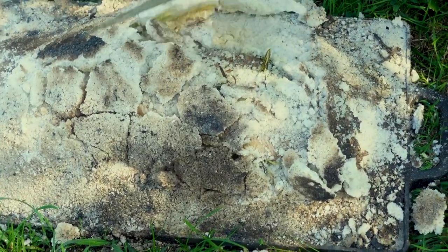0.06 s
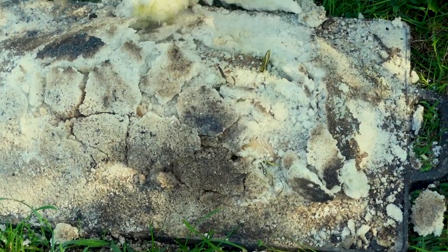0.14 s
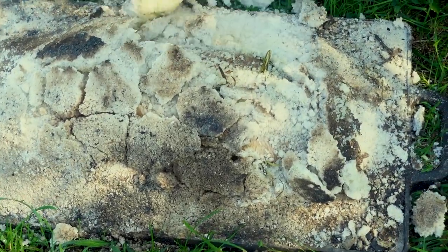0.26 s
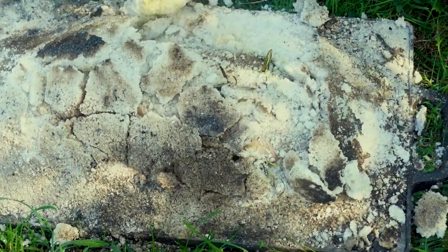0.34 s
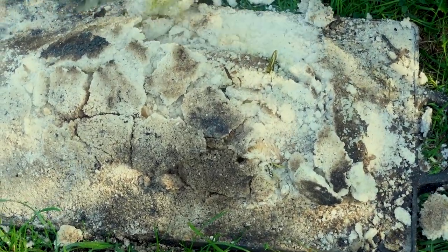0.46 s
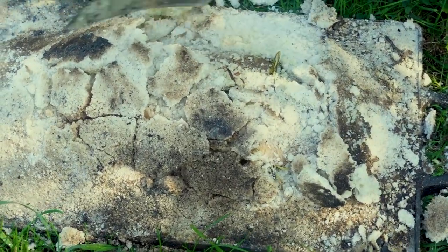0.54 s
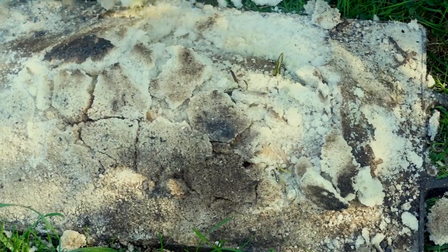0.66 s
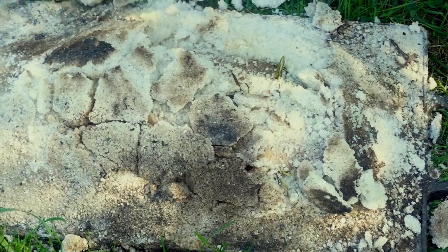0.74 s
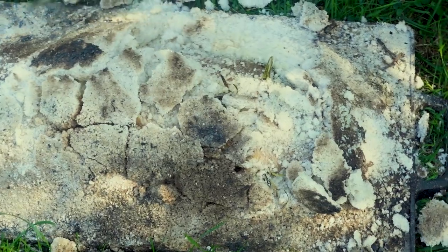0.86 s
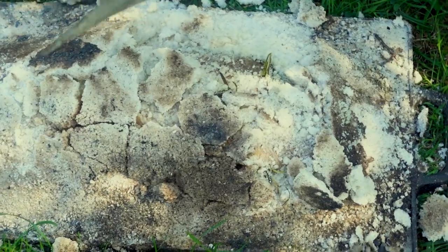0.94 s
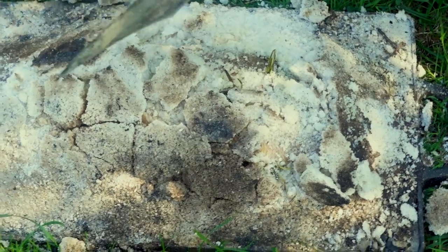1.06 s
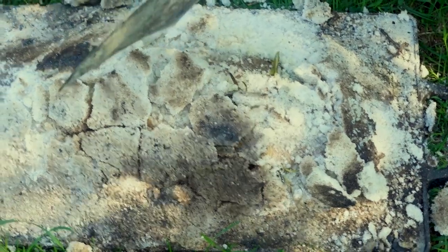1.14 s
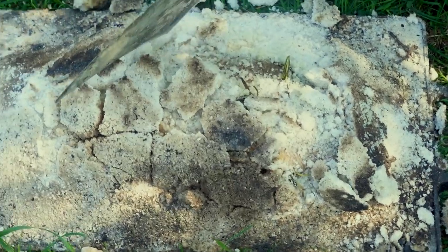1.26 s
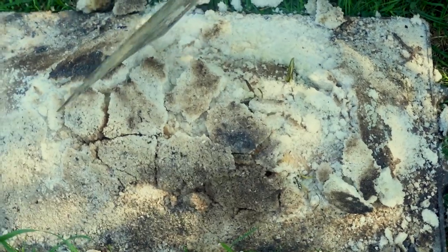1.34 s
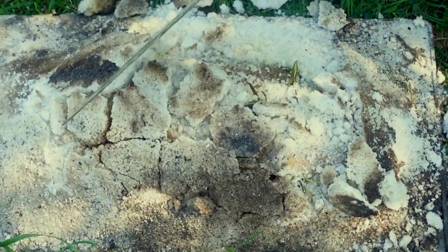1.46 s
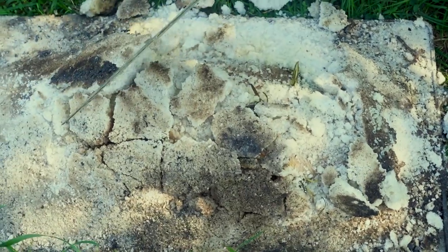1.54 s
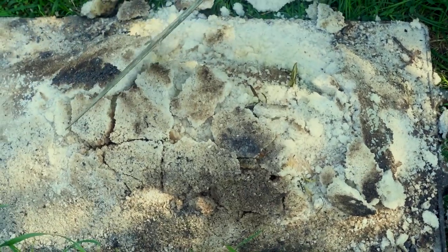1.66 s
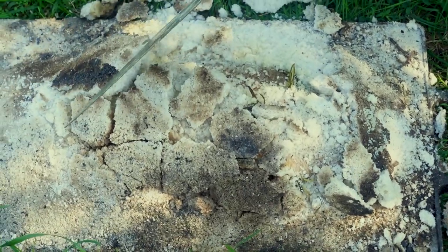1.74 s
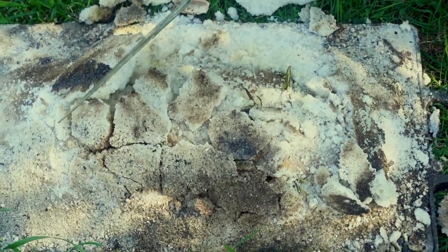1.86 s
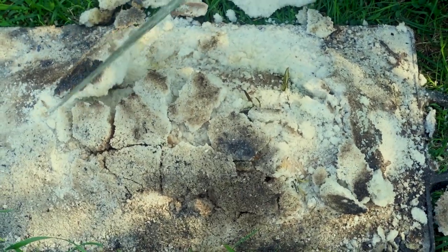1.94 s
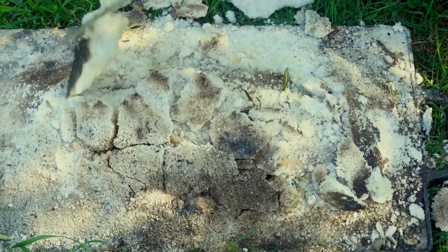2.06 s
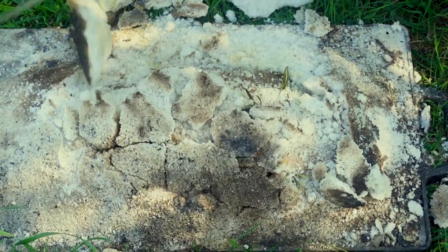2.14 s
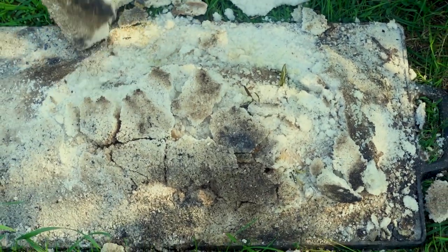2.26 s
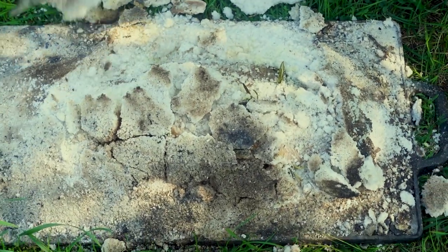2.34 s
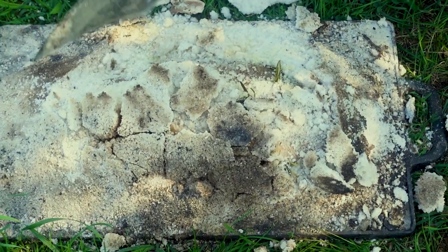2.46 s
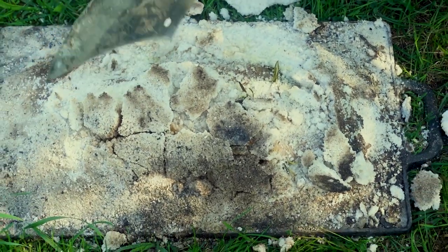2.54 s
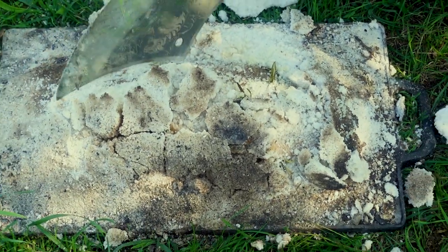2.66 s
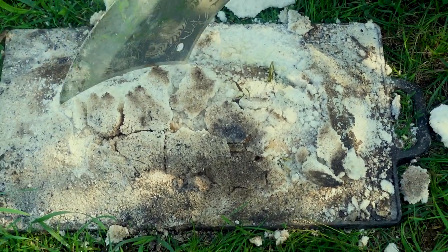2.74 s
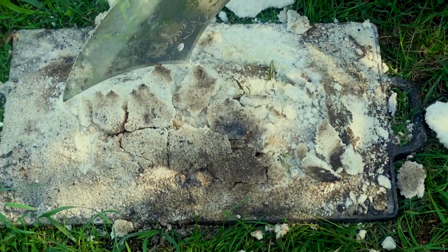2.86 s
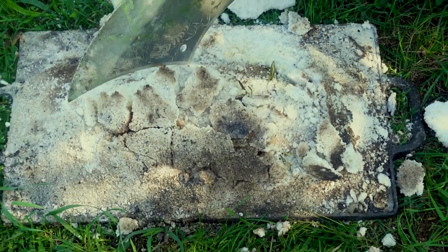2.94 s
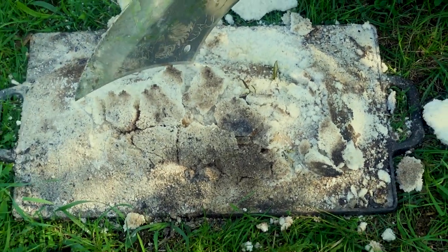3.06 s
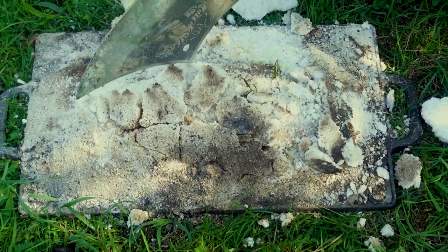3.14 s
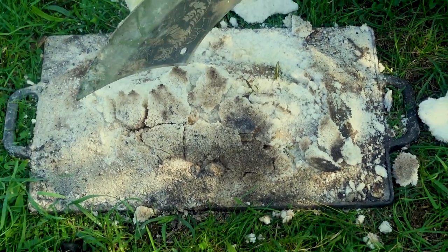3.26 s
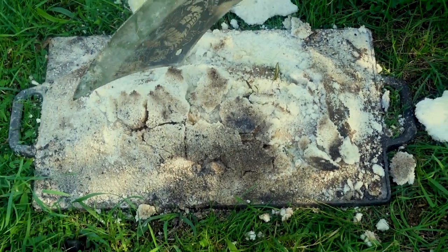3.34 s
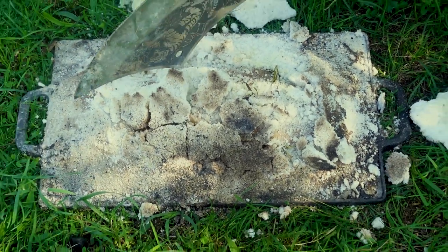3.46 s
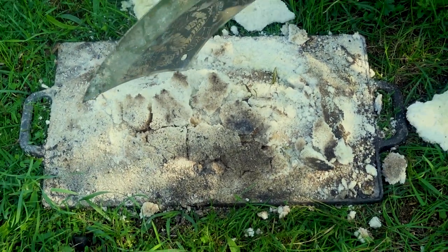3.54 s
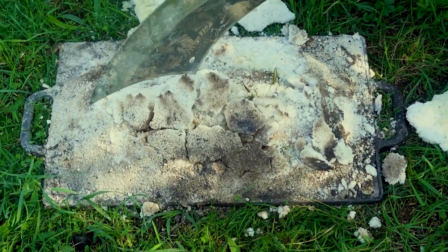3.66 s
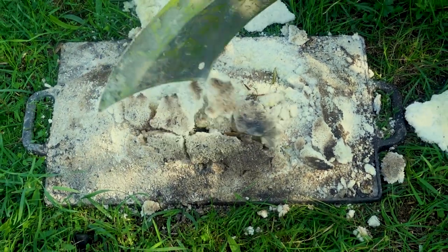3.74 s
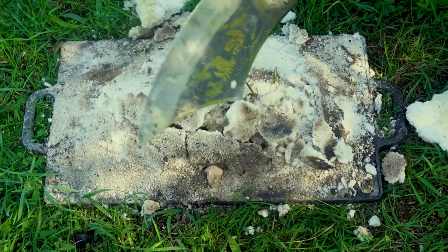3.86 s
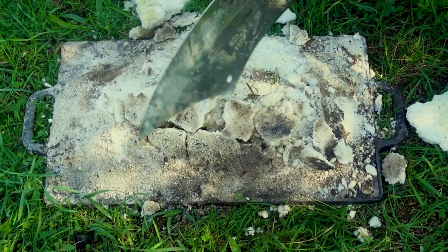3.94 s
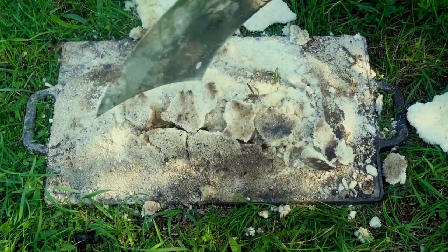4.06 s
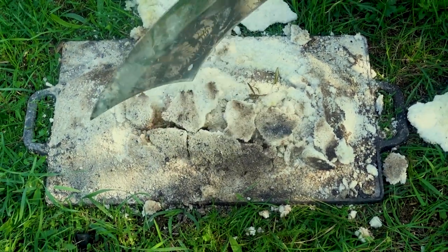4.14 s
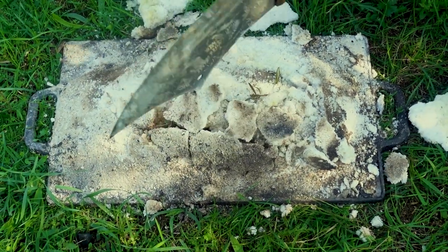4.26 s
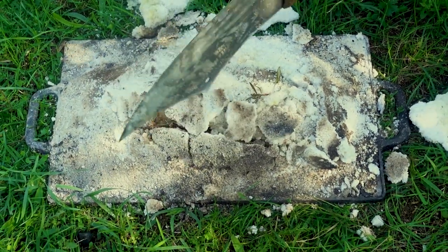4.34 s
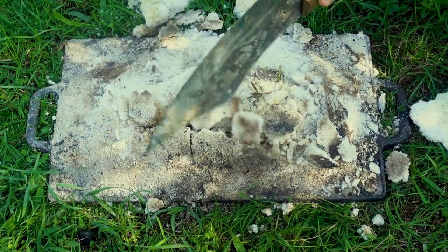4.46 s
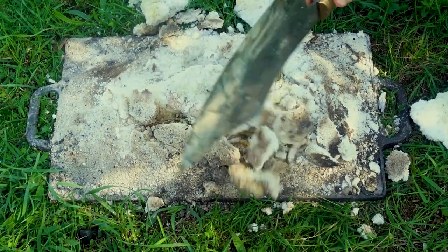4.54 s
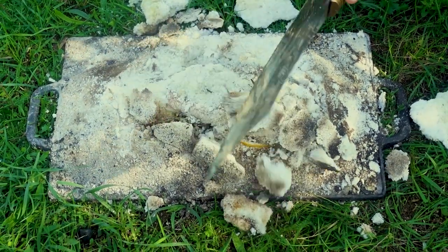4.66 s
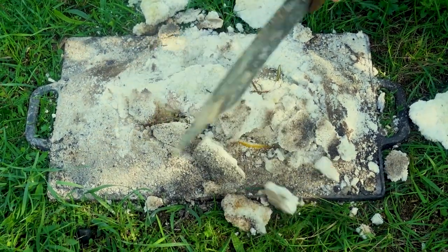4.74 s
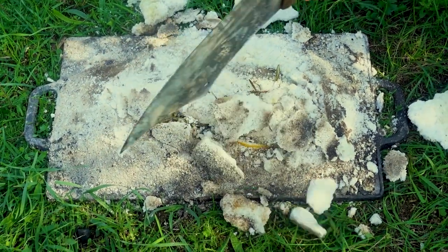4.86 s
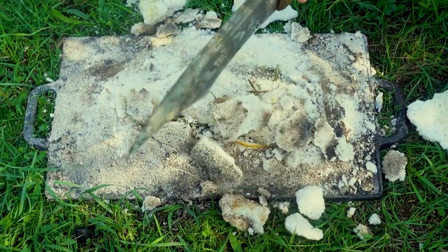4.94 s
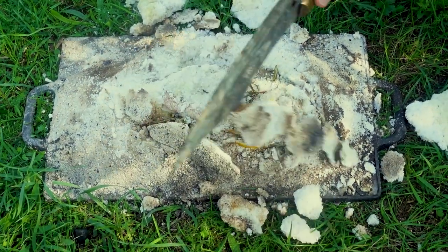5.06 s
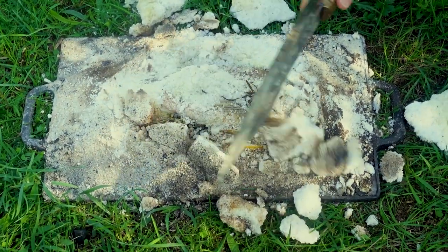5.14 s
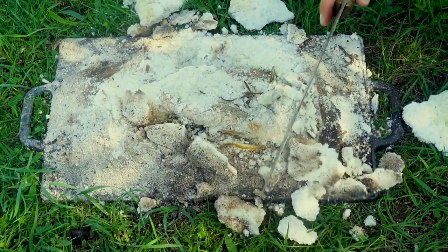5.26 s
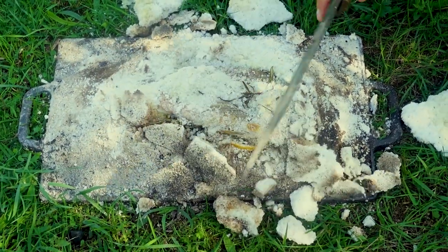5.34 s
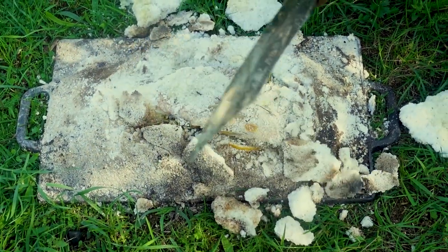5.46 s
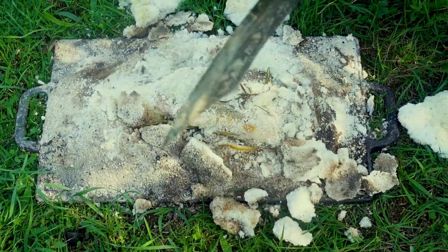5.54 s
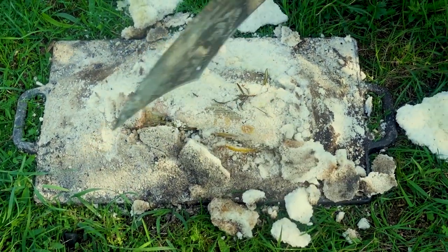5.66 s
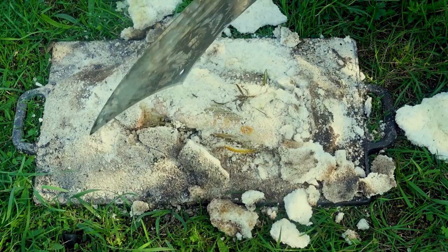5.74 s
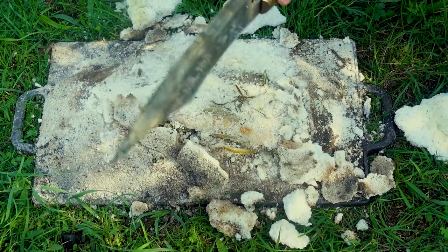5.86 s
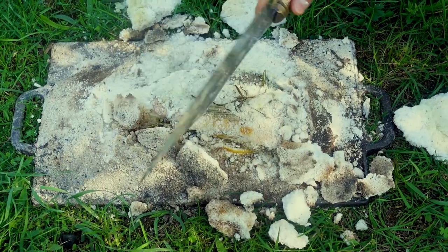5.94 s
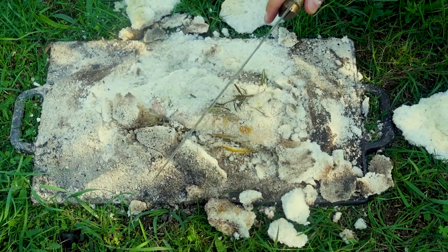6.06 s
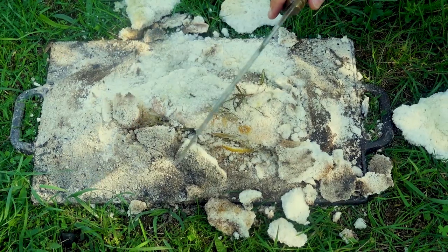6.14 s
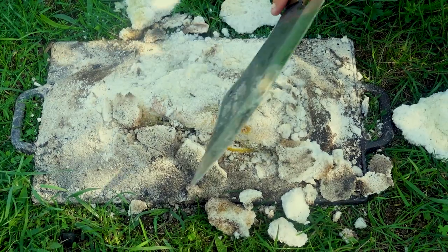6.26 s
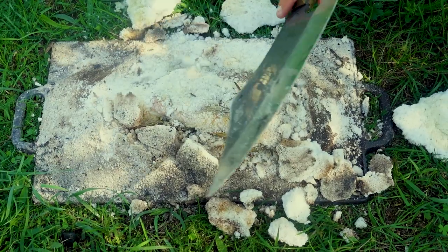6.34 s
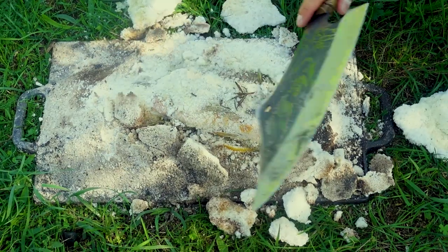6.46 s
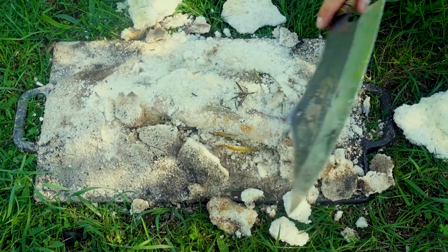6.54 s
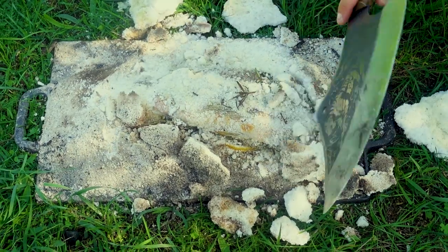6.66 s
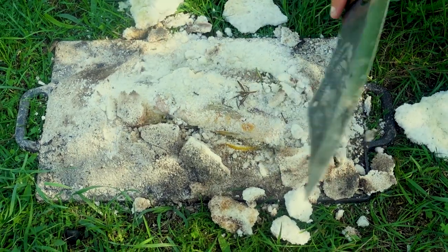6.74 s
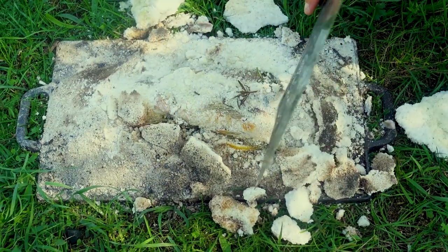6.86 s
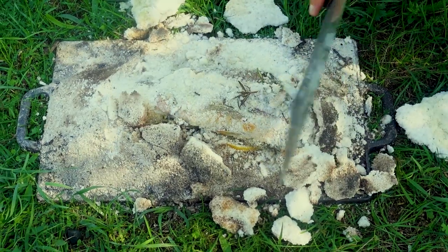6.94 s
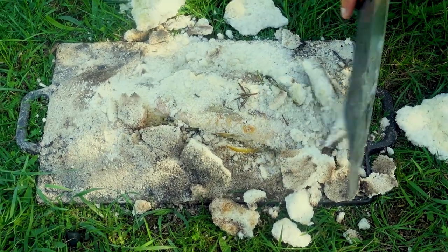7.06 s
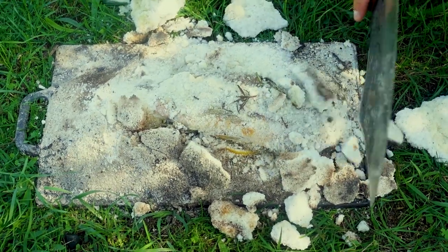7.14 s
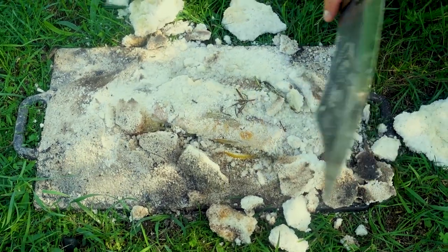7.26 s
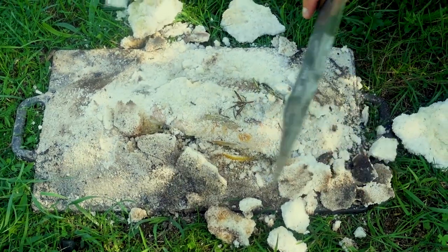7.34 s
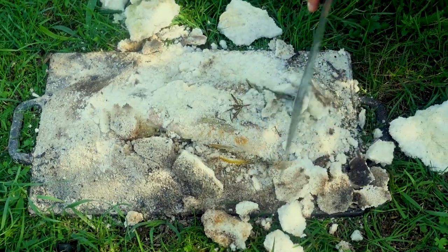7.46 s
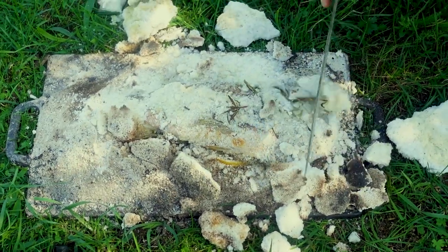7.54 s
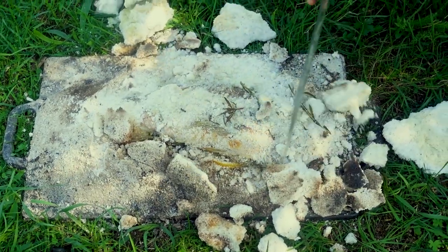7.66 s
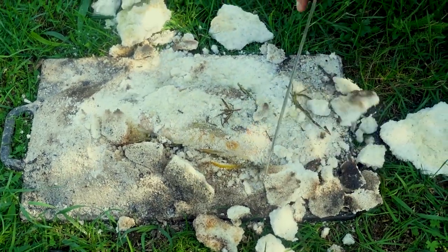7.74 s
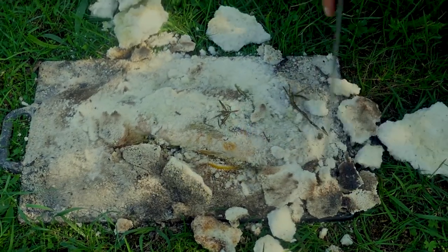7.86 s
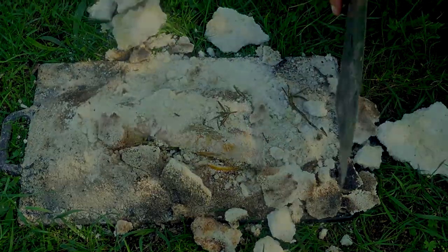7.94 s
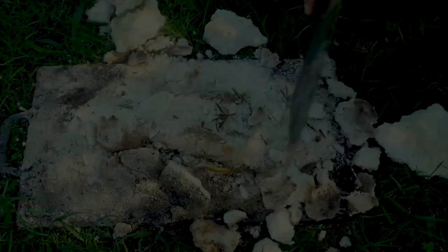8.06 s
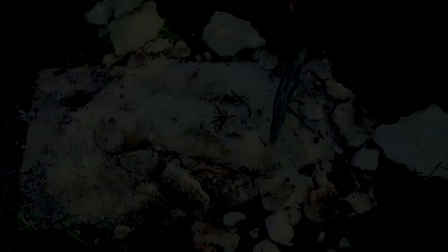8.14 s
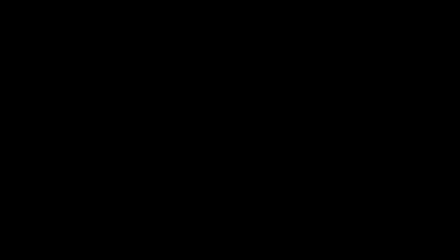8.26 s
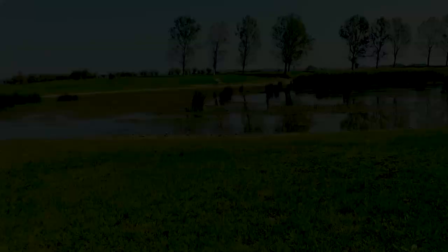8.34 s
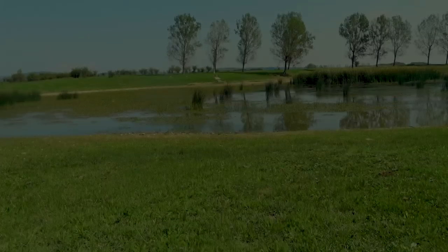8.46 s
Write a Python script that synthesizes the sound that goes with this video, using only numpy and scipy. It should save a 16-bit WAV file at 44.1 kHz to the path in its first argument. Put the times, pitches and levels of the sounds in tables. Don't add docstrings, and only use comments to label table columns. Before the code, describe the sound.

A steel blade cracks, crunches and scrapes through a hot baked salt crust over steady sizzling, chunks thudding, then abruptly only a faint low gust.

```python
import sys
import numpy as np
from scipy import signal
from scipy.fft import rfft, irfft, next_fast_len
from scipy.io import wavfile
from scipy.ndimage import uniform_filter1d, map_coordinates

SR = 44100
rng = np.random.default_rng(int(sys.argv[2]) if len(sys.argv) > 2 else 0)


def dump_mix(stems):
    frames = np.atleast_2d(stems).T
    limited = np.clip(frames, -1, 1)
    pcm = np.round(limited * 32767).astype(np.int16)
    wavfile.write(sys.argv[1], SR, pcm)


def natural_amplitude(level_db):
    exponent = np.asarray(level_db, float) / 20
    return 10 ** exponent


N = 374398
PADDED = next_fast_len(N)
SCENE_CHANGE_S = 8.277

# [start_s, peak_db, pitch_hz]
SNAPS = [(2.43, -35.5, 1900), (4.417, -33, 1850), (4.424, -33, 1850), (4.6285, -30, 3300),
         (1.2176, -32, 2890), (1.3391, -9.5, 3030), (1.3847, -28, 2900), (1.4286, -35, 3030),
         (1.4332, -26, 2620), (1.52, -19, 3340), (1.528, -24, 3220), (1.5345, -27, 3300),
         (1.539, -31, 3300), (1.543, -32, 3600), (1.3392, -15.5, 4940), (1.3394, -27, 1590),
         (1.5192, -25.5, 4280), (1.5294, -33, 4600), (5.3425, -29, 2680), (4.5962, -34.5, 1110),
         (4.588, -34, 1300), (4.6405, -31, 3400), (4.7075, -32, 1500), (4.7872, -30, 3320),
         (4.802, -30, 2400), (7.2164, -33, 3300), (3.5562, -34, 2220), (3.963, -33, 3170),
         (4.628, -27, 2050), (4.6687, -33, 1700), (5.0897, -24, 3840), (5.1626, -20.5, 1950),
         (5.2722, -31, 2900), (6.9858, -33, 3470)]
# [start_s, peak_db, pitch_hz]
SPLITS = [(1.5613, -31, 1740), (2.5506, -30, 6720), (3.879, -32, 1350), (3.9944, -23, 1430),
          (4.1085, -32, 4690), (4.2724, -25, 7000), (4.313, -26, 5870), (4.3491, -28, 6230),
          (4.3571, -28, 5320), (4.5342, -29, 5000), (4.5494, -26, 3300), (4.716, -22.5, 1400),
          (4.754, -33, 1310), (4.7881, -34, 1930), (5.21, -28, 4670), (5.3195, -36, 4910),
          (5.3424, -23, 1460), (7.217, -27, 1550), (7.2155, -35, 5800), (3.852, -31, 4850),
          (3.9335, -34, 2800), (7.6481, -20.5, 7240), (7.767, -34, 1200), (7.8002, -31.5, 1780)]
# [start_s, peak_db, pitch_hz, blade_ring_db]
STRIKES = [(0.6519, -25.5, 4770, 9.5), (4.4383, -19, 5200, -4), (5.9825, -14, 5350, -21),
           (5.987, -16, 6500, -14), (5.9944, -8.5, 6790, -20), (6.0072, -14, 7530, -22),
           (6.0115, -18, 6520, -16), (6.0142, -21, 6940, -19), (6.027, -32, 8000, -20),
           (6.0425, -30, 6000, -15), (6.0538, -21, 5290, -10), (6.0643, -11, 4800, -13),
           (6.0793, -19, 6320, -11), (6.0829, -19, 6330, -31), (6.1226, -26, 5340, -14),
           (6.1741, -22, 4480, -16), (6.4776, -38, 4420, -16), (6.5136, -25, 2700, -20),
           (6.582, -26, 5600, -11), (6.5895, -21, 6500, -3.5), (6.6271, -25, 4410, -1.5),
           (6.6663, -21, 4000, -6), (7.0255, -29, 4700, -17), (7.0429, -18, 2870, -12),
           (7.109, -23, 4620, -9), (7.436, -23, 5600, -8), (7.4518, -28.5, 1640, -25)]

# [peak_s, length_ms, level_db, treble_db]
CRUSHES = [(.79, 60, -42, -3), (1.433, 44, -42.5, -24), (1.54, 30, -42, -15), (1.558, 42, -50, -22),
           (2.55, 116, -63, 16), (3.558, 22, -48, -6), (3.805, 14, -43, 0.5), (3.84, 63, -45, 1),
           (3.854, 14, -40, 2.5), (3.893, 14, -40.5, -8), (3.868, 23, -36.5, -5), (3.9, 130, -44.5, -6),
           (4.536, 53, -40.5, -10), (4.588, 75, -41, -14), (4.634, 63, -38, -1), (4.705, 20, -50, -15),
           (4.754, 31, -47, 1), (4.786, 25, -42, -7), (5.094, 63, -39.5, 1), (5.135, 55, -39, -2),
           (5.16, 33, -32.5, -1.5), (5.195, 82, -39.5, 1), (7.216, 21, -42, 2)]
# [peak_s, length_ms, level_db, treble_db]
SCRAPES = [(4.555, 26, -38, 3), (5.987, 16, -31, 5), (5.996, 17, -34.5, 8), (6.009, 29, -38.5, 7.5),
           (6.047, 56, -41, -2), (6.065, 25, -35.5, 6), (6.08, 30, -32, 4), (6.114, 37, -45.5, 0),
           (6.143, 36, -44, -1), (6.181, 44, -42, -7), (6.203, 53, -43.5, 3.5), (6.518, 85, -36.5, .5),
           (6.552, 130, -39, -2), (6.59, 42, -32.5, 6.5), (6.628, 42, -32, .5), (6.647, 32, -34.5, -2),
           (7.441, 19, -36, -1), (7.527, 40, -40.5, -4), (7.582, 30, -48, -1)]
# [peak_s, length_ms, level_db, treble_db]
CLINKS = [(0.656, 13, -45, 4), (4, 30, -38.5, -6), (4.442, 24, -31.5, 0.5), (6.668, 14.4, -25.5, 1),
          (7.05, 20, -34, -3.5), (7.062, 25, -30, -3.5), (7.087, 14, -35, 3), (7.08, 50, -44, -8),
          (6.25, 140, -47, -10), (6.092, 28, -46, 0), (7.113, 27, -30.5, -3.5), (7.107, 9, -33, 3),
          (7.13, 27, -37.5, -11)]
# [peak_s, length_ms, level_db, treble_db]
BITES = [
    (5.068, 25, -34, -3),
    (7.043, 14, -34, -2),
    (5.143, 16, -36, 1),
    (6.479, 56, -41, -2),
    (6.583, 12, -39, 2),
]
# [peak_s, length_ms, level_db, treble_db]
DRAGS = [
    (.78, 400, -41, -19),
    (6.72, 160, -53.5, 4),
]
PUSH_KINDS = [
    (0.4, 0.05),
    (0.41, 0.37),
    (0.36, 0.82),
    (0.039, 0.43),
    (0.1, 0.18),
]

# [mode_hz, width_hz, level_db]
BLADE_MODES = [(2050, 21, -9.5), (2400, 34, -2.5), (2660, 45, -3.5), (3600, 30, -10), (3390, 50, -3.5),
               (3916, 97, 2.5), (4425, 38, -1.5), (5210, 91, 0.5), (6290, 100, 0.5), (6875, 120, 2),
               (8280, 47, -5.5), (8760, 43, -7.5), (9300, 110, -9.5), (9960, 65, -5), (1310, 18, -11)]
# [start_s, first_hz, second_hz, third_hz]
CONTACT = [(0, 4430, 6300, 8260), (4.0, 3900, 4430, 6890), (4.5, 6300, 6890, 3900), (5.0, 2370, 3900, 4430),
           (5.9, 6890, 8650, 3410), (6.03, 6300, 3410, 1310), (6.13, 6890, 4430, 6300),
           (6.222, 4430, 3600, 2370), (6.46, 6300, 4430, 3900), (6.56, 6300, 6890, 4430),
           (6.615, 3900, 6890, 6300), (6.655, 3900, 2650, 8650), (7.0, 4430, 3900, 6890),
           (7.052, 2650, 6300, 3900), (7.08, 6890, 6890, 2650), (7.109, 3900, 6300, 6890),
           (7.4, 6300, 4430, 2650)]
MUTING_DB = [-11, -5.5, -10, -4, -5, -6, -3, -8, -3, -5.5, -5, -8, -5.5, -6, -5, -6, -7]

# [start_s, peak_db, pitch_hz]
THUDS = [(1.144, -38.5, 447), (1.259, -43, 445), (1.287, -46, 453), (1.324, -39.5, 190), (1.326, -42, 555),
         (1.366, -39, 348), (1.428, -37, 454), (1.557, -35, 470), (1.566, -36, 398), (2.651, -57, 447),
         (2.69, -53, 434), (4.716, -36, 800), (4.598, -48, 645), (5.342, -43, 605), (5.344, -48, 220),
         (3.893, -48.5, 516), (4.749, -42.5, 645), (4.787, -41.5, 720), (5.079, -41, 770),
         (6.581, -45, 550), (7.054, -37, 480), (7.06, -42, 230), (7.215, -30, 500), (7.549, -47, 537),
         (7.699, -49, 517), (7.765, -36.5, 674), (7.798, -42, 645), (7.95, -49, 614), (7.52, -48, 566),
         (7.85, -40, 543), (7.879, -36, 574)]

# [frequency_hz, level_db (per Hz)]
SIZZLE_COLOUR = [(410, -22), (700, -15.5), (1150, -12), (1360, -9), (1570, -10.5), (1960, -6), (2790, -2.5),
                 (3020, -3), (3720, -3.5), (4580, -5.5), (6590, -12.5), (12200, -20.5), (15800, -29)]
SIZZLE_EDGES_HZ = (1100, 2500, 5000, 9000, 15000)
# [rest_level_db, vigour_slope (dB/dB), brightness_slope (dB/dB)]
SIZZLE_ANSWER = [
    (-54.5, 0.91, -0.93),
    (-52.5, 0.52, -0.16),
    (-51.5, 1.2, 0.13),
    (-57.5, 0.84, 1),
]
# [centre_hz, width_hz, level_db]
HOLLOWS = [(622, 93, 5.5), (1300, 82, 2.5), (1726, 190, 4), (2980, 260, 0), (4000, 410, 1)]
# [time_s, vigour_db, brightness_db]
STEAM = [(0, 1, -4), (.14, 4.5, -2.5), (.45, 3.5, 0.5), (.7, 3, 0), (.9, 2.5, 0.5), (1.3, 2, -3.5),
         (1.7, -4, -1.5), (2.05, -2.5, 2), (2.56, .1, 3), (2.7, -6.5, 1), (3.78, -5, -1), (4.0, 0.3, -2),
         (4.35, 3, 1), (4.9, 0.5, 0), (5.6, -1.5, 1), (6.45, -1, 1), (7.37, -1.5, -0.7), (8.27, -1.5, 1)]
# [peak_s, extra_vigour_db]
VENTS = [
    (4.63, 3.5),
    (5.3, 3.5),
    (6.72, 6.5),
    (7.76, 1.5),
]
# [start_s, extra_path_ms, share (-1..1, negative = inverted)]
MIRROR = [(0, 1.15, .12), (.95, .42, .15), (1.42, .657, .34), (2.17, .6, 0), (2.66, .535, -.36),
          (3.19, .655, .12), (3.35, .505, .22), (3.85, .475, .15), (4.03, .415, .11), (5.35, .425, .2),
          (5.68, .425, .07)]
# [start_s, end_s, start_hz, end_hz, level_db]
GLINTS = [
    (2.2, 2.53, 5000, 15500, 4),
    (2.41, 2.66, 5200, 13500, 7),
    (.05, 0.43, 5500, 15000, 3),
    (4.1, 4.38, 7600, 11600, 5),
    (.75, 1.0, 2500, 2700, 4),
    (.36, 0.71, 14400, 16000, 6.5),
    (.64, 0.82, 10300, 2300, 4.5),
]
# [delay_ms, share]
RIM_ECHOES = [
    (1.29, .12),
    (2.55, .09),
]

# [time_s, left_minus_right_db]
LEAN = [(0.0, -0.2), (1.6, -1.5), (2.6, -0.8), (5.6, -0.4), (6.7, -1), (7.3, -1.5), (7.6, -1)]
# [time_s, half_lag_samples]
PORT_LAG = [(0, .2), (1.05, .2), (1.15, .6), (1.6, .6), (3.6, .55), (3.75, .2), (8.49, .2)]
# [frequency_hz, likeness (0-1)]
LIKENESS = [(30, .97), (70, 1), (200, .48), (400, 0.19), (750, 0.38), (1300, 0.77), (2400, 0.95),
            (6000, .94), (15000, 0.84)]

# [frequency_hz, level_db (per Hz)]
AIR = [(15, -70), (25, -40.5), (50, -21), (91, -7), (235, -6), (278, -8), (323, -9.5), (403, -6.5),
       (1140, -13.5), (1400, -10), (1820, -54.5), (3080, -120)]
AIR_DB = -68.5
# [frequency_hz, level_db (per Hz)]
GUST = [(15, -53), (25, -25.5), (33, -32), (70, -26), (86, -36), (107, -18), (200, -15), (276, -8),
        (342, -15.5), (392, -28.5), (461, -25), (572, -27), (5090, -38.5), (15800, -52.5)]
# [time_s, level_db]
GUST_SWELL = [(8.28, -60.5), (8.32, -61), (8.36, -61), (8.41, -61), (8.45, -60.5), (8.49, -61)]
# [frequency_hz, level_db (per Hz)]
MEADOW = [(500, -12.5), (1000, -5), (1600, -1), (2400, -2.5), (4500, -8.5), (7500, -10.5), (12000, -14.5),
          (15800, -21.5)]
MEADOW_DB, MEADOW_AFTER_DB = -61.5, -9
# [time_s, level_db]
INSECTS = [
    (1.2, -78),
    (1.6, -62),
    (3.55, -63),
    (3.75, -80),
]


def rms_one(x):
    return x / np.sqrt(np.mean(x ** 2) + 1e-20)


def in_time(rows):
    s, *columns = np.transpose(rows)
    return [np.interp(np.arange(N) / SR, s, c) for c in columns]


def at_hz(points, hz):
    point_hz, value = np.transpose(points)
    return np.interp(np.log(hz), np.log(point_hz), value)


def bin_hz():
    return np.maximum(np.arange(PADDED // 2 + 1) * SR / PADDED, 10)


def drift(rate_hz):
    r = np.exp(-2 * np.pi * rate_hz * 40 / SR)
    slow = signal.lfilter([1], [1, -2 * r, r * r], rng.standard_normal(N // 40 + 2002))
    slow = rms_one(slow[2000:])
    return np.interp(np.arange(N) / 40, np.arange(len(slow)), slow)


def grains(per_s, spread_db):
    sizes = natural_amplitude(spread_db * np.minimum(rng.exponential(1, N), 5))
    signs = rng.choice([-1, 1], N)
    return rms_one(sizes * signs * (rng.random(N) < per_s / SR))


def band(x, low_hz, high_hz):
    sos = signal.butter(2, [low_hz, high_hz], "band", fs=SR, output="sos")
    return signal.sosfilt(sos, x + 1e-18) * np.sqrt(SR / 2.2 / (high_hz - low_hz))


def stereo_colour(mid, side, spectrum):
    hz = bin_hz()
    alike = np.clip(at_hz(LIKENESS, hz), 0, 1)
    shared = np.sqrt(1 + alike) * rfft(mid, PADDED)
    apart = np.sqrt(1 - alike) * rfft(side, PADDED)
    return hz, (shared + apart * [[1], [-1]]) * natural_amplitude(at_hz(spectrum, hz))


def cracks():
    crust_ring_db = -46
    # blade ring dB, half width in octaves, crumb pitch over piece pitch (0 = no loose piece)
    breaks = [(*row, crust_ring_db, 0.49, 1.03) for row in SNAPS]
    breaks += [(*row, crust_ring_db, 0.59, 1.48) for row in SPLITS]
    breaks += [(*row, 0.67, 0) for row in STRIKES]
    out, jolts, size = np.zeros(N), np.zeros(N), 1500
    noise, t = rng.standard_normal((len(breaks), size)), np.arange(size) / SR
    blow = 4.3 * (t == 0)
    for (s, db, hz, ring_db, octaves, crumb_ratio), crumble in zip(breaks, noise):
        crumble_s = 0.0036 + 12.0 / hz
        if not crumb_ratio:
            crumble_s *= 0.74
        crumble = crumble * natural_amplitude(-60 * t / crumble_s)
        spread, centre_hz = 2 ** octaves, min(hz * (crumb_ratio or 1), 7500.0)
        snap = band(blow + crumble, centre_hz / spread, min(centre_hz * spread, 16000))
        tick = band(blow + crumble * natural_amplitude(-60 * t / .004), 8000, 11360)
        snap = snap / np.abs(snap).max() + natural_amplitude(-12.5) * tick / np.abs(tick).max()
        if crumb_ratio:
            chip = band(np.sin(2 * np.pi * hz * t) * natural_amplitude(-60 * t * hz / 14), 0.62 * hz, 2.02 * hz)
            snap = snap + 0.72 * chip / np.abs(chip).max()
        i = round(s * SR)
        out[i:i + size] += natural_amplitude(db) * snap / np.abs(snap).max()
        jolts[i:i + size] += natural_amplitude(db + ring_db) * (1.5 * blow + .3 * crumble)
    return out, jolts


def grind():
    grit = grains(7000, 3.0) * natural_amplitude(2.0 * drift(90))
    power = np.zeros((4, N))
    for rows, (rise, ring) in zip((CRUSHES, SCRAPES, CLINKS, BITES, DRAGS), PUSH_KINDS):
        shares = np.array([1 - ring, 1 - ring, ring, ring])
        for s, ms, db, treble_db in rows:
            start, end = s - rise * ms / 1000, s + (1 - rise) * ms / 1000
            span = np.arange(round(start * SR), round(end * SR))
            swell = np.interp(span / SR, [start, s, end], [0, 1, 0]) ** 1.68
            levels = natural_amplitude(np.array([db, db + treble_db, db, db + treble_db]))
            power[:, span] += (shares * levels ** 2)[:, None] * swell
    body, treble, low_force, high_force = grit * np.sqrt(power)
    tray_shake = natural_amplitude(-19.5) * band(body, 630, 1350) + natural_amplitude(-29.0) * band(body, 152, 256)
    gritty = natural_amplitude(-1.5) * band(body, 1150, 3800)
    gritty += natural_amplitude(-4.0) * band(treble, 5400, 9050) + natural_amplitude(-14) * band(treble, 9000, 14000)
    return gritty + tray_shake, natural_amplitude(2.5) * low_force, natural_amplitude(3.0) * high_force


def blade(low_force, high_force, jolts):
    out, total, contact = np.zeros(N), 0, np.array(CONTACT)
    now = np.searchsorted(contact[:, 0] * SR, np.arange(N), side="right") - 1
    for k, (hz, width_hz, db) in enumerate(BLADE_MODES):
        favoured = (np.abs(contact[:, 1:] / hz - 1) < .03).any(axis=1)
        muted_db = np.add(MUTING_DB, 1.6 if hz > 1500 else -9.0)
        drive_db = np.where(favoured, 1.6, muted_db)[now] + 1.0 * drift(7.8)
        force = low_force if hz < 5000 else high_force
        drive = (force + jolts) * natural_amplitude(drive_db)
        r = np.exp(-np.pi * .6 * width_hz / SR)
        b = np.sqrt((1 - r * r) / 2) * np.array([1, 0, -1])
        a = [1, -2 * r * np.cos(2 * np.pi * hz / SR), r * r]
        out += (-1) ** k * natural_amplitude(db) * signal.lfilter(b, a, drive + 1e-18)
        total += natural_amplitude(db) ** 2
    return out / np.sqrt(total)


def thuds():
    out, size = np.zeros(N), 3000
    noise, t = rng.standard_normal((len(THUDS), size)), np.arange(size) / SR
    attack = 1 - np.exp(-t / 0.0019)
    fall_db = -46 * t / 0.037
    for (s, db, hz), crumbs in zip(THUDS, noise):
        note = 0.5 * np.sin(2 * np.pi * hz * t)
        puff = 0.39 * band(crumbs, 0.66 * hz, 1.82 * hz) + 0.19 * band(crumbs, 180, 263)
        i = round(s * SR)
        out[i:i + size] += natural_amplitude(db + 4.5 + fall_db) * (note + puff) * attack
    return out


def sizzle():
    hz, pair = stereo_colour(grains(9000, 2.27), grains(9000, 3.5), SIZZLE_COLOUR)
    hollow_db = sum(db / (1 + (2 * (hz - top_hz) / width_hz) ** 2) for top_hz, width_hz, db in HOLLOWS)
    pair = pair * natural_amplitude(hollow_db)
    edges, power = SIZZLE_EDGES_HZ, np.mean(np.abs(pair) ** 2, axis=0) * 2 / PADDED ** 2
    own_db = [10 * np.log10(power[(hz > a) & (hz < b)].sum()) for a, b in zip(edges, edges[1:])]
    vigour_db, bright_db = vigour()
    lift_db = np.array([db - own + a * vigour_db + b * bright_db
                        for (db, a, b), own in zip(SIZZLE_ANSWER, own_db)])
    centres = np.log(np.sqrt(np.multiply(edges[1:], edges[:-1])))
    out, bright, together = 0, 0, drift(6.9)
    steps = np.log(np.geomspace(900, 15000, 13))
    for k, step in enumerate(steps):
        weights = [np.interp(step, centres, row) for row in np.eye(4)]
        gain_db = weights @ lift_db + 0.66 * together + 1.1 * drift(14.0)
        for start, end, start_hz, end_hz, db in GLINTS:
            span = slice(round(start * SR), round(end * SR))
            way = (np.arange(N)[span] / SR - start) / (end - start)
            beam = np.log(start_hz + (end_hz - start_hz) * way ** 1.85)
            gain_db[span] += db * np.sin(np.pi * way) ** .5 * np.exp(-((step - beam) / 0.31) ** 2)
        window = np.interp(np.log(hz), steps, np.eye(13)[k])
        layer = natural_amplitude(gain_db) * irfft(pair * window, PADDED)[:, :N]
        out = out + layer
        bright = bright + layer * np.interp(step, np.log([3500, 6500]), [.15, 1])
    path_ms, share = poses()
    path_ms = path_ms + .012 * drift(1.9)
    for ms, part in [(path_ms, share), *RIM_ECHOES]:
        late = np.arange(N) - ms * SR / 1000
        echo = np.array([map_coordinates(c, [late], order=3) for c in bright])
        out = out + part * echo
    return out


def vigour():
    rise_s, fall_s = 0.23, 0.29
    vigour_db, bright_db = in_time(STEAM)
    for s, db in VENTS:
        vigour_db = vigour_db + in_time([(s - rise_s, 0), (s, db), (s + fall_s, 0)])[0]
    return vigour_db, bright_db


def poses():
    s, *columns = np.transpose(MIRROR)
    now = np.searchsorted(s * SR, np.arange(N), side="right") - 1
    return [uniform_filter1d(c[now], size=round(.09 * SR), mode="nearest") for c in columns]


def open_air(spectrum):
    _, pair = stereo_colour(*rng.standard_normal((2, N)), spectrum)
    return rms_one(irfft(pair, PADDED)[:, :N])


def meadow():
    white = rng.standard_normal((2, 2, N))
    leaves = rfft(white[0], PADDED) * natural_amplitude(at_hz(MEADOW, bin_hz()))
    leaves = rms_one(irfft(leaves, PADDED)[:, :N])
    insects = band(white[1], 3000, 4100)
    return natural_amplitude(MEADOW_DB + 0.86 * drift(1.7)) * leaves + natural_amplitude(in_time(INSECTS)[0]) * insects


def scene():
    gritty, *forces = grind()
    breaks, jolts = cracks()
    knife = gritty + breaks + blade(*forces, jolts) + thuds()
    ground = np.roll(knife, 29) * natural_amplitude([[-13], [-16]]) + np.roll(knife, 71) * natural_amplitude([[-17], [-14]])
    lag = in_time(PORT_LAG)[0] * np.gradient(knife) * [[-1], [1]]
    lean_db = in_time(LEAN)[0] * [[.5], [-.5]]
    knife = natural_amplitude(lean_db + [[-.6], [.6]]) * (knife + ground + lag)
    rumble = natural_amplitude(AIR_DB + 1.5 * drift(2.4)) * open_air(AIR)
    tray = knife + natural_amplitude(lean_db) * sizzle() + rumble
    before = np.clip((SCENE_CHANGE_S - np.arange(N) / SR) / 0.0018, 0, 1)
    gust = natural_amplitude(in_time(GUST_SWELL)[0]) * open_air(GUST)
    return before * tray + (1 - before) * gust + natural_amplitude((1 - before) * MEADOW_AFTER_DB) * meadow()


def band_limit(x):
    return signal.sosfilt(signal.butter(12, 16470, fs=SR, output="sos"), x)


def record(dry):
    bass_cut = signal.butter(4, 52, "high", fs=SR, output="sos")
    top_cut = signal.cheby2(12, 60, 16250, fs=SR, output="sos")
    mix = signal.sosfilt(np.vstack([bass_cut, top_cut]), dry)
    return band_limit(mix)


dry = scene()
out = record(dry)
dump_mix(out)
```